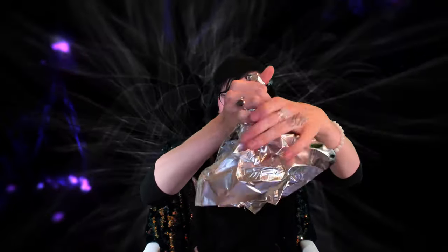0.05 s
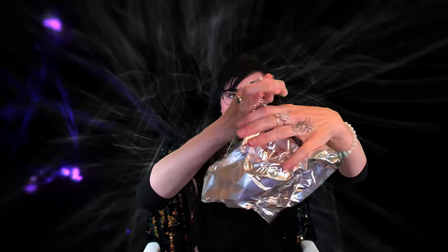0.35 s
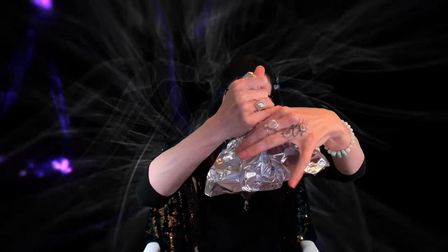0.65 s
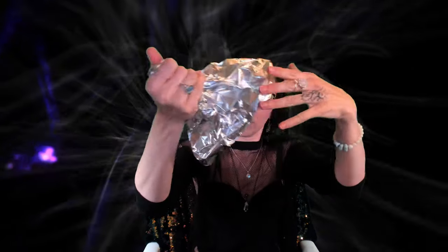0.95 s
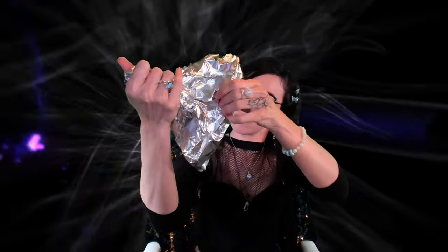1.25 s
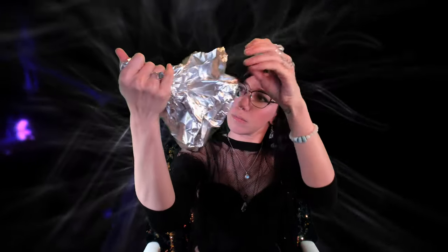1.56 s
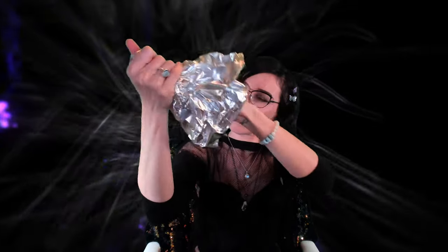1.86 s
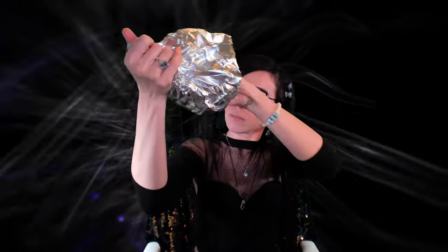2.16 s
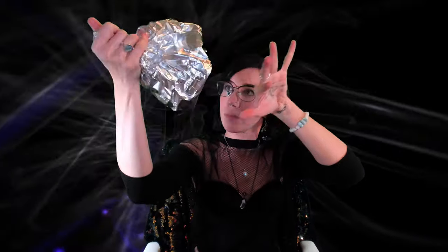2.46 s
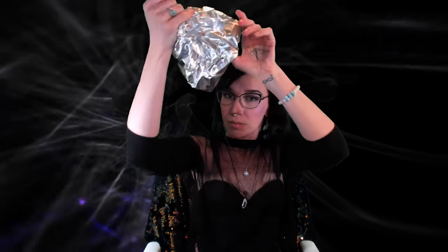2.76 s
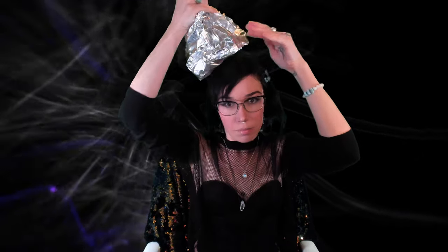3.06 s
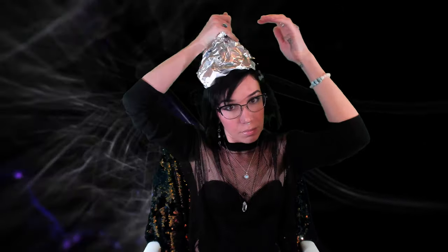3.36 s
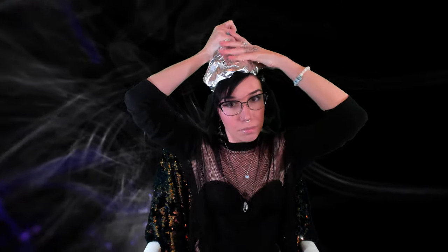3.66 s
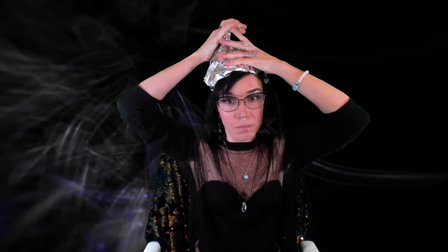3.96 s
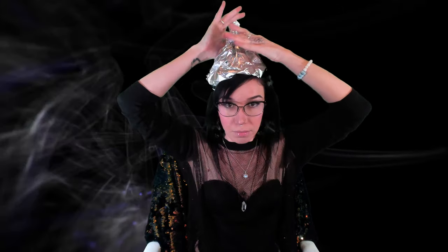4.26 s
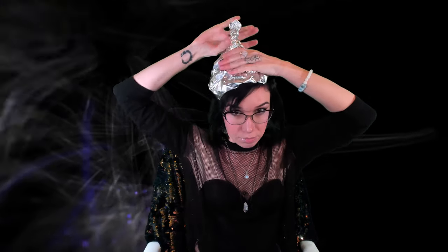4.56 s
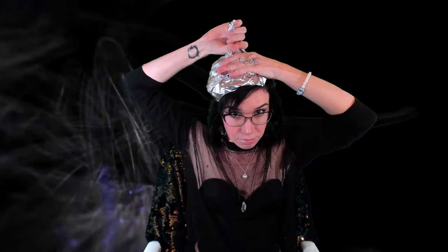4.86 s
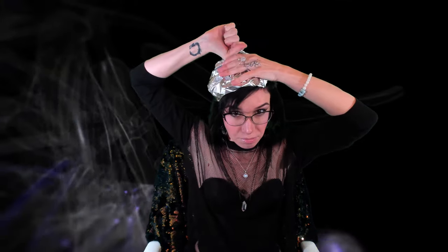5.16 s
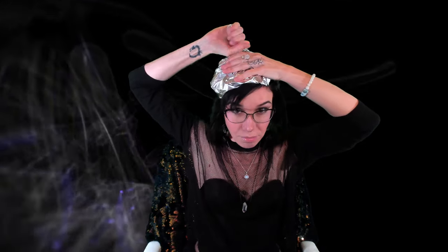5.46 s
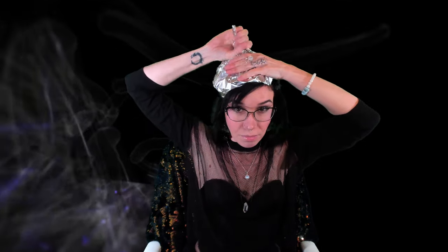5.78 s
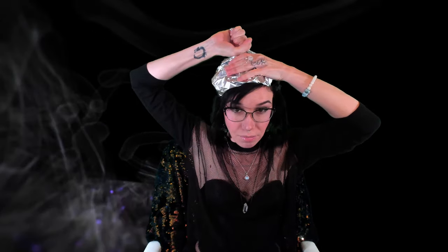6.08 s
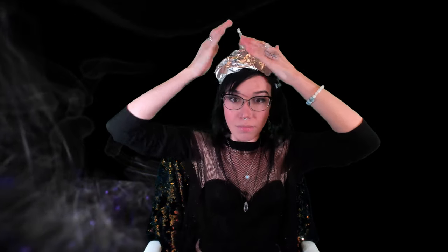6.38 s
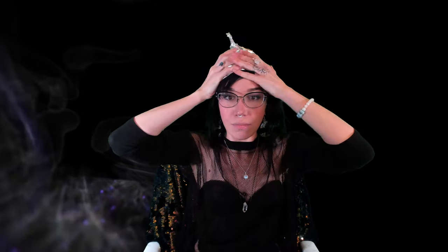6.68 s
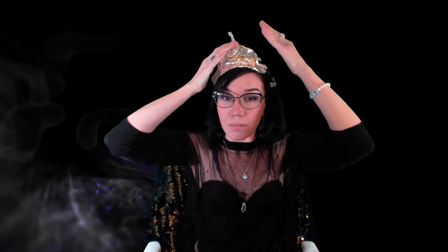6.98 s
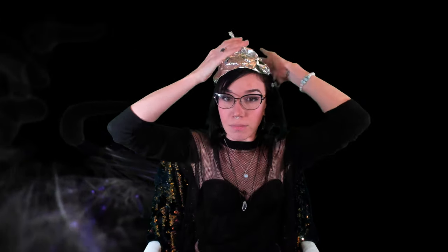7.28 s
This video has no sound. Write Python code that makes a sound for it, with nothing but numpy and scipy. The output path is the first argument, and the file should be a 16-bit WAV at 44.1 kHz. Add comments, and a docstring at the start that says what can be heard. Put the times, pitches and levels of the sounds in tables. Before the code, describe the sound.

Hands crumple a sheet of aluminium foil close to the microphone in a small room. At first the loose sheet crinkles loudly, with sharp snaps and hollow pops. After a few strong crunches it is packed into a cap and pressed onto a head, giving softer, finer crackles in short, irregular squeezes. Faint room noise, electrical hum and a low throb lie behind.

```python
"""Aluminium foil, crushed by hand into a cap and pressed onto a head, close to the microphone in a small room.
Each squeeze buckles thousands of tiny facets; larger creases snap singly or give way in short avalanches.
The loose sheet sounds loud and hollow, the packed cap finer; near the end a fingertip squeaks on it.
Behind the foil lie dull room noise, mains hum and a faint low throb."""
import sys
import numpy as np
from scipy import signal
from scipy.fft import rfft, irfft, next_fast_len
from scipy.io import wavfile
from scipy.ndimage import uniform_filter1d, map_coordinates

SR = 44100
rng = np.random.default_rng(int(sys.argv[2]) if len(sys.argv) > 2 else 0)


def file_out(sig):
    """Save sig as 16-bit WAV at sys.argv[1]."""
    # one column per channel
    cols = np.atleast_2d(sig).T
    # limit, then scale
    lim = np.clip(cols, -1, 1)
    pcm = np.round(lim * 32767).astype(np.int16)
    wavfile.write(sys.argv[1], SR, pcm)


N = 332073
TOP_HZ = 16000  # upper edge of everything heard
CREASING_FROM_S, CREASING_S = 0.59, 1.23  # the last flat facets crease and lose their sheen
PACKING_FROM_S, PACKING_S = 2.36, 1.59  # the sheet closes into a cap


def amp(db):
    """Decibels to gain."""
    return 10 ** (np.asarray(db) / 20)


def unit(x):
    """x at rms 1."""
    return x / np.sqrt(np.mean(x ** 2) + 1e-20)


def along(points, hz):
    """(Hz, value) points read on a log frequency axis."""
    point_hz, values = np.transpose(points)
    return np.interp(np.log(hz + 1), np.log(point_hz + 1), values)


def progress(start_s, length_s):
    """A share that climbs from 0 to 1."""
    return np.clip((np.arange(N) / SR - start_s) / length_s, 0, 1)


def add(track, start_s, sound):
    """Mix a sound into the track."""
    start = int(np.clip(round(start_s * SR), 0, N))
    track[start:start + len(sound)] += sound[:N - start]


def coloured(x, gain):
    """x through the minimum-phase filter whose magnitude is gain(Hz)."""
    size = 2 * next_fast_len(len(x) // 2 + 2048)
    magnitude = np.maximum(gain(np.fft.rfftfreq(size, 1 / SR)), 1e-6)
    cepstrum = irfft(np.log(magnitude))
    cepstrum[1:size // 2] *= 2
    cepstrum[size // 2 + 1:] = 0
    return irfft(rfft(x, size) * np.exp(rfft(cepstrum)))[:len(x)]


def band(x, lo_hz, hi_hz, order=3):
    """The part of x between two edges."""
    return signal.sosfilt(signal.butter(order, [lo_hz, hi_hz], "band", fs=SR, output="sos"), x)


def band_noise(count, lo_hz, hi_hz):
    """Noise between two edges, at rms 1."""
    return unit(band(rng.standard_normal(count), lo_hz, hi_hz, order=2))


def levelled(x, window_s=0.07):
    """x with its slow swells taken out, so that only the grain is left."""
    return x / np.sqrt(np.abs(uniform_filter1d(x * x, int(window_s * SR))) + 1e-9)


def room_tone(hum_hz=120):
    """The room's own sound: dull noise and mains hum."""
    # spectrum of the noise: frequency_hz, level_db
    air_spectrum = [(15, -47), (25, -14.5), (123, -3.5), (170, -7.5), (242, -5.5), (451, -14), (607, -11.5),
                    (677, -15.5), (16000, -43)]
    air = unit(coloured(rng.standard_normal(N), lambda hz: amp(along(air_spectrum, hz))))
    hum = np.sin(2 * np.pi * hum_hz * np.arange(N) / SR)
    return amp(-58) * air + amp(-63.5) * hum


def throb(period_s=0.1024, width_s=0.0043):
    """Faint low thumps in the background, about ten a second."""
    # runs of thumps: start_s, stop_s
    runs = [(.05, .6), (.718, 2.4), (2.522, 3.9), (4.018, 5.6), (5.72, 7.3), (7.418, 7.53)]
    lead_s = 0.02
    from_centre = (np.arange(SR // 25) / SR - lead_s) / width_s
    thump = amp(-44.5) * from_centre * np.exp(-from_centre ** 2)
    out = np.zeros(N)
    for start_s, stop_s in runs:
        for centre_s in np.arange(start_s, stop_s, period_s):
            add(out, centre_s - lead_s, thump * amp(1.5 * rng.normal()))
    return out


def room_tail(x, paths=10, crossfade_s=0.009):
    """The small room's short tail; facets all over the foil each reach the walls by other paths."""
    # decay of the room: frequency_hz, t60_s
    decay_times = [(200, 0.42), (600, 0.21), (2500, 0.28), (9000, 0.16), (15000, 0.067)]
    out = np.zeros(N)
    place = np.arange(N) / SR / crossfade_s
    for path in range(paths):
        hz, t, spectrum = signal.stft(rng.standard_normal(SR // 2), SR, nperseg=256)
        decay = amp(-60 * t / along(decay_times, hz)[:, None])
        tail = signal.istft(spectrum * decay, SR, nperseg=256)[1]
        share = np.maximum(1 - np.abs((place - path + 1) % paths - 1), 0)  # the paths take turns
        out += signal.oaconvolve(x * np.sqrt(share), tail / np.linalg.norm(tail))[:N]
    return out


def squeak():
    """A fingertip sticks and slips on the foil: a faint, unsteady, falling whistle."""
    # course of the slide: time_s, pitch_hz, level_db
    slide = [(7.075, 5100, -90), (7.12, 4770, -70), (7.17, 4650, -80), (7.18, 4300, -87), (7.2, 4000, -75),
             (7.23, 3770, -84)]
    time_s, pitch_hz, level_db = np.transpose(slide)
    now = np.arange(N) / SR
    waver = 0.0078 * unit(uniform_filter1d(rng.standard_normal(N), SR // 400))
    hz = np.interp(now, time_s, pitch_hz) * (1 + waver)
    sliding = (now > time_s[0]) & (now < time_s[-1])
    return sliding * amp(np.interp(now, time_s, level_db)) * np.sin(2 * np.pi * np.cumsum(hz) / SR)


def flexing(effort):
    """Under a hard squeeze the whole sheet flexes and pushes a little air at the microphone."""
    return amp(-28.5) * effort * band_noise(N, 38, 91)


def crackle(per_s, spread_db, t60_s, ring_db, grain_samples=220):
    """Facets buckle at random moments, most faintly; each gives a tiny burst and rings at its own pitch."""
    count = int(per_s * N / SR)
    when, strength, smallness, life, side = rng.random((5, count, 1))
    t = np.arange(grain_samples) / SR
    gain = amp(spread_db * np.minimum(-np.log(1 - strength), 3.6))
    pitch_hz = 700 + 14500 * smallness ** 1.3
    ring = amp(ring_db) * np.sign(side - 0.5) * np.sin(2 * np.pi * pitch_hz * t)
    burst = rng.standard_normal((count, grain_samples))
    decay = amp(-60 * t / (t60_s * (0.5 + life)))  # decay times scatter around t60_s
    grains = gain * (ring + burst) * decay
    places = (when * N).astype(int) + np.arange(grain_samples)
    return np.bincount(places.ravel(), grains.ravel(), N)[:N]


def open_sheet(hz):
    """Gain of the loose foil, whose folds enclose a few broad resonances."""
    # spectrum of the loose sheet: frequency_hz, level_db
    spectrum = [(59, -65.5), (100, -11.5), (249, -2.5), (335, -7), (461, -2), (583, -4.5), (836, -1),
                (1130, -10), (1450, -6.5), (1910, -5), (3700, -7), (4980, -7.5), (9610, 1.5), (14100, -4),
                (16000, -6)]
    # resonances of its folds: centre_hz, width_hz, level_db
    hollows = [(850, 370, -2.5), (1380, 210, 0.5), (9500, 2100, 1)]
    peaks = sum(amp(db) / (1 + (2 * (hz - centre) / width) ** 2) for centre, width, db in hollows)
    return amp(along(spectrum, hz)) * (1 + peaks)


def settling(effort, relax_s=0.34):
    """Strained creases let go late: sparse crisp ticks that linger after each squeeze."""
    hold = np.exp(-1 / (relax_s * SR))
    strain = np.minimum(signal.lfilter([1 - hold], [1, -hold], effort), amp(-42))
    ticks = crackle(per_s=75, spread_db=3.5, t60_s=0.0067, ring_db=4)
    return amp(-23.5) * strain * unit(band(ticks, 3900, TOP_HZ, order=2))


def pops(rise_s=0.0014):
    """A broad panel flips and rings briefly, hollow, on a close pair of modes."""
    # panels flipping over: start_s, level_db, pitch_hz, t60_s
    flips = [(.048, -32.5, 181, 0.054), (0.275, -20, 1570, 0.024), (0.282, -39, 210, 0.23),
             (.329, -11, 796, 0.016), (.644, -32, 351, 0.097), (.646, -28, 1380, 0.031),
             (.751, -30, 827, 0.053), (0.766, -29, 282, 0.033), (.935, -37.5, 772, 0.18),
             (1.135, -42, 1450, 0.064)]
    out, t = np.zeros(N), np.arange(SR // 4) / SR
    onset = 1 - np.exp(-t / rise_s)
    for start_s, level_db, pitch_hz, t60_s in flips:
        lower = np.sin(2 * np.pi * pitch_hz * t)
        upper = 0.11 * np.sin(2 * np.pi * (1.08 * pitch_hz * t + rng.random()))
        add(out, start_s, (lower + upper) * onset * amp(level_db - 60 * t / t60_s))
    return out


def small_snaps(effort):
    """While the sheet still has flat facets, small creases snap one by one above the crinkle."""
    clicks = coloured(crackle(per_s=90, spread_db=3.5, t60_s=0.008, ring_db=3), open_sheet)
    still_flat = 1 - progress(CREASING_FROM_S, CREASING_S)
    return amp(0.5) * effort * still_flat * unit(band(clicks, 700, 11000, order=2))


def snaps(rise_s=0.00032, ring_t60_s=0.014, rasp_t60_s=0.017, crack_t60_s=0.025):
    """A large crease snaps through: its facet rings briefly, with a rasp and a bright crack."""
    # single creases, levels relative: start_s, level_db, pitch_hz, rasp_db, crack_db
    creases = [(0.023, -26, 9500, -6, -13), (0.047, -10, 1660, -11, -6), (0.061, -3, 1520, -5.5, -12),
               (0.158, -28, 10500, -14, 7), (0.242, -9, 8850, -9, -3.5), (0.249, -15, 1620, 0, -16),
               (0.275, -2.5, 1520, -31, -13), (0.283, -14, 1580, -23, -21), (0.327, -6.5, 5150, -10, -16),
               (0.454, -9, 1570, -3, -20), (0.483, -19, 9800, -17, -14), (0.501, -11, 9600, -9, -8),
               (0.525, -9, 10230, -13, -6), (0.553, -16.5, 8800, 0.5, -42), (0.569, -19.5, 9300, 6, 5),
               (0.576, -5, 9700, -9, -33), (0.588, -7.5, 9030, -7, -3.5), (0.674, -14, 1460, -3.5, -2),
               (0.706, -11.5, 9800, -6, -2), (0.743, -22, 1410, -7, 4), (0.758, -13.5, 1520, 1, -2),
               (0.908, -22, 865, -9, -8), (1.014, -42.5, 725, -40, 7), (1.209, -16.5, 1460, -17, -24),
               (1.421, -13, 2670, -12, -3), (1.807, -13, 850, -18, -25), (2.042, -12.5, 2320, -12, -10),
               (2.43, -20, 8500, -6, -6), (2.652, -32.5, 7240, -9, -10), (2.692, -35, 4130, -16, -1),
               (2.801, -15, 3660, -10, -2), (3.469, -23, 3400, -24, -7), (3.744, -18.5, 3280, 4, -29),
               (3.784, -23.5, 2646, 4, -2), (4.143, -21, 3110, -6, -20), (4.365, -13.5, 11850, -6, -3),
               (4.642, -20, 3380, -18, -24), (4.855, -18.5, 6400, -19, -9), (4.94, -18.5, 1220, -3.5, -20),
               (5.034, -32, 1810, 1, 4), (5.134, -24.5, 8150, -33, -6), (5.24, -28, 3960, -20, -18),
               (5.275, -43, 13000, 2, -2), (5.401, -27.5, 9500, -16, -5), (5.624, -19, 1850, -12, -22)]
    out, t = np.zeros(N), np.arange(SR // 25) / SR
    onset = 1 - np.exp(-t / rise_s)
    for start_s, level_db, pitch_hz, rasp_db, crack_db in creases:
        # crowded modes blur the pitch
        drift = np.cumsum(rng.standard_normal(len(t))) * 0.67 * pitch_hz / SR
        ring = np.sin(2 * np.pi * pitch_hz * t + drift) * amp(-60 * t / ring_t60_s)
        rasp = band_noise(len(t), 900, 3700) * amp(rasp_db - 60 * t / rasp_t60_s)
        crack = band_noise(len(t), 6700, 11050) * amp(crack_db - 60 * t / crack_t60_s)
        add(out, start_s, amp(level_db) * onset * (amp(-8.5) * ring + amp(-7) * (rasp + crack)))
    return out


def squeezes(sag_db_per_s=26.5, release_db_per_s=122.5):
    """Each squeeze takes hold, sags and lets go; gives the crinkle's power and its fine creases in dB."""
    # squeezes, fine creases set against the middle band: start_s, attack_s, length_s, level_db, fine_db
    grips = [(0, 0.001, 0.032, -31, 1.5), (0.132, 0.037, 0.19, -40, 3.5),
             (0.254, 0.0045, 0.17, -38.5, -3.5), (0.442, 0.011, 0.044, -38.5, -2),
             (0.658, 0.12, 0.1, -34, -1), (.9, .011, 0.011, -45, -9), (1.128, 0.0049, 0.023, -46.5, 3),
             (1.188, .015, 0.039, -41.5, 0), (1.273, 0.039, 0.056, -29, -1), (1.409, 0.01, 0.055, -32, -1),
             (1.816, 0.0068, 0.075, -27.5, -1.5), (2.043, .002, 0.034, -34, -2.5),
             (2.132, 0.036, 0.073, -23, -1.5), (2.262, 0.037, 0.09, -28, -1), (2.564, 0.093, 0.21, -58, -6),
             (2.754, 0.05, .12, -35.5, -1.1), (2.912, 0.019, 0.12, -43, -1), (3.214, 0.027, 0.036, -44, -1),
             (3.275, 0.04, 0.13, -41, -1.5), (3.438, .011, 0.23, -47, -3), (3.586, 0.055, 0.053, -38, -1.5),
             (3.704, 0.027, 0.18, -41, -0.5), (3.934, 0.048, 0.053, -41.5, -2),
             (4.05, .02, 0.12, -52.5, -1.5), (4.157, 0.047, 0.044, -34.5, -3),
             (4.25, 0.017, .16, -40.5, -1), (4.447, 0.14, 0.13, -35.5, -2.5),
             (4.634, .015, 0.068, -42.5, 1), (4.81, 0.017, 0.12, -45.5, -0.5),
             (4.939, .003, 0.16, -42.5, -1), (5.345, 0.081, 0.1, -53.5, 2.5),
             (5.427, 0.027, 0.032, -35.5, -4), (5.603, 0.018, 0.035, -39, -4.5),
             (5.661, 0.099, 0.32, -38.5, -2.5), (6.089, 0.047, 0.06, -36.5, -2.5),
             (6.193, 0.035, 0.074, -53.5, 11), (6.422, 0.043, 0.072, -37.5, -2.5),
             (6.569, 0.031, 0.058, -42, 2), (6.746, 0.066, 0.19, -49, -1.5),
             (7.292, 0.028, 0.054, -41, -2.5), (7.389, .019, 0.11, -46.5, 1)]
    brush_db, brush_db_per_s = -22, 583  # the fingers brush the foil just before they grip
    power, weighted_fine = np.full(N, 1e-14), np.zeros(N)
    now = np.arange(N) / SR
    for start_s, attack_s, length_s, level_db, fine_db in grips:
        span = slice(max(int((start_s - 0.1) * SR), 0), int((start_s + length_s + 0.5) * SR))
        t = now[span] - start_s
        brush = amp(brush_db + brush_db_per_s * np.minimum(t, 0))
        grip = np.maximum(np.clip(t / attack_s, 0, 1), brush)
        fade_db = sag_db_per_s * np.maximum(t, 0) + release_db_per_s * np.maximum(t - length_s, 0)
        squeeze_power = (grip * amp(level_db - fade_db)) ** 2
        power[span] += squeeze_power
        weighted_fine[span] += squeeze_power * fine_db
    return power, weighted_fine / power


def clumping(clumps_per_s=45, depth_db=1.5):
    """Facets give way in clumps: a quick random flutter of gain."""
    position = np.arange(N) / SR * clumps_per_s
    return amp(depth_db * map_coordinates(rng.standard_normal(2048), [position], mode="wrap"))


def avalanches(fade_s=0.021):
    """Runs of creases give way together, each a short surge in the crinkle's power."""
    # runs of creases: start_s, level_db, rise_s
    crunches = [(.27, -21.5, 0.0055), (0.326, -29.5, .0026), (0.569, -40, .0011), (0.583, -25.5, 0.012),
                (0.642, -33.5, 0.00092), (1.242, -37.5, 0.00084), (1.518, -14, 0.022),
                (1.807, -28.5, 0.0025), (1.952, -23.5, 0.0072), (2.159, -21.5, 0.0079), (2.201, -18, .0073),
                (2.309, -24, 0.0071), (2.748, -37, 0.0011), (2.972, -20.5, 0.023), (4.27, -34, 0.0076),
                (4.362, -26.5, 0.0055), (4.786, -38.5, .002), (4.885, -45, .002), (4.944, -36, 0.0026),
                (5.46, -33, .01), (5.523, -30.5, 0.014), (6.124, -37.5, 0.0043), (7.294, -45.5, 0.0011),
                (7.326, -34.5, .0054)]
    power, t = np.zeros(N), np.arange(SR // 5) / SR
    for start_s, level_db, rise_s in crunches:
        surge = (1 - np.exp(-t / rise_s)) * np.exp(-(t / fade_s) ** 2)
        add(power, start_s, (amp(level_db) * surge) ** 2)
    return power


def crinkle(effort, fine_db):
    """The crackle first loses its sheen, then grows finer and denser as the sheet is packed into a cap."""
    # spectrum of the tight cap: frequency_hz, level_db
    cap_spectrum = [(180, -33), (300, -8.5), (478, -12.5), (737, -4), (978, -7.5), (1230, -4), (1480, -5.5),
                    (1810, -3), (2140, -4.5), (5430, -7.5), (10700, -6.5), (15000, -11.5), (16000, -8.5)]
    loose_facets = crackle(per_s=1800, spread_db=2.5, t60_s=0.008, ring_db=-4.5)
    packed_facets = crackle(per_s=2400, spread_db=0, t60_s=0.0075, ring_db=-5)
    loose = unit(coloured(loose_facets, open_sheet))
    packed = unit(coloured(packed_facets, lambda hz: amp(along(cap_spectrum, hz))))
    creasing, packing = progress(CREASING_FROM_S, CREASING_S), progress(PACKING_FROM_S, PACKING_S)
    body = np.sqrt(1 - packing) * loose + np.sqrt(packing) * packed
    sheen = np.sqrt(1 - creasing) * loose + np.sqrt(creasing) * packed
    broad_db = -9 - 3.5 * packing - 0.78 * fine_db  # broad facets yield to packing and to fine creases
    broad = amp(broad_db) * levelled(band(body, 74, 1028))
    middle = levelled(band(body, 1150, 4530))
    fine = amp(fine_db) * levelled(band(sheen, 5900, TOP_HZ))
    return effort * (broad + middle + fine)


def scene():
    """Foil close to one microphone, with the walls' answer and the room tone behind it."""
    squeeze_power, fine_db = squeezes()
    effort = np.sqrt(squeeze_power * clumping() ** 2 + avalanches())
    foil = crinkle(effort, fine_db) + small_snaps(effort) + settling(effort) + flexing(effort)
    foil += snaps() + pops() + squeak()
    return (foil + amp(-4.5) * room_tail(foil) + room_tone() + throb())[None]


def record(dry):
    """The recorder keeps nothing above its band limit."""
    size = next_fast_len(N + SR // 4)
    passed = 1 / (1 + (np.fft.rfftfreq(size, 1 / SR) / TOP_HZ) ** 200)
    return irfft(rfft(dry, size) * passed, size)[:, :N]


dry = scene()
out = record(dry)
file_out(out)
```